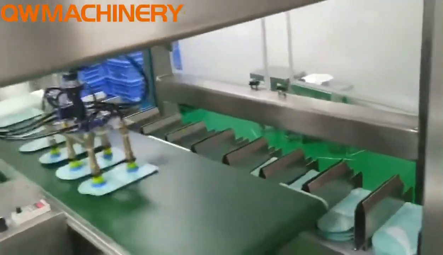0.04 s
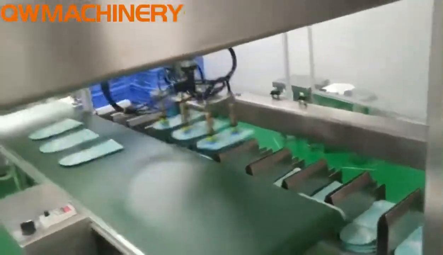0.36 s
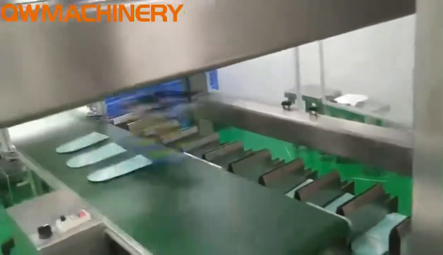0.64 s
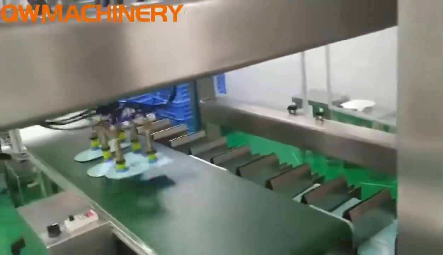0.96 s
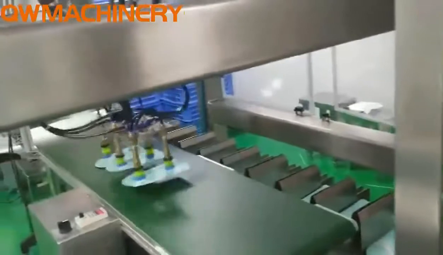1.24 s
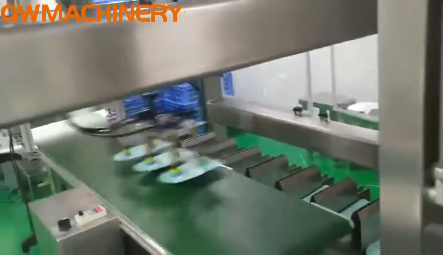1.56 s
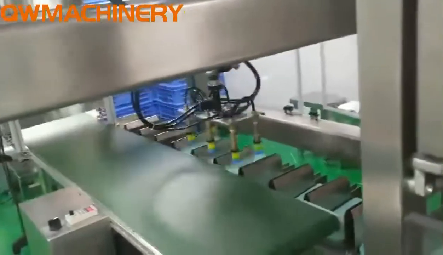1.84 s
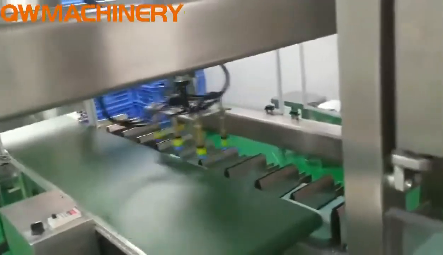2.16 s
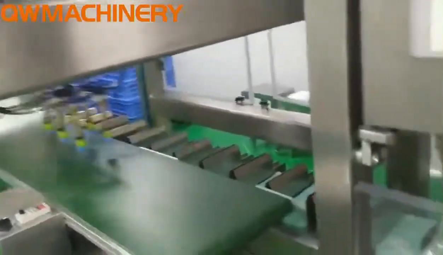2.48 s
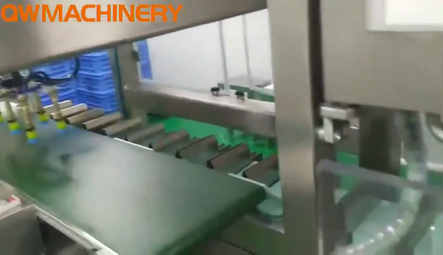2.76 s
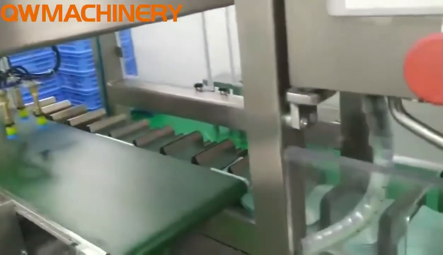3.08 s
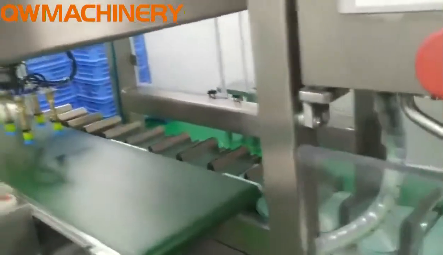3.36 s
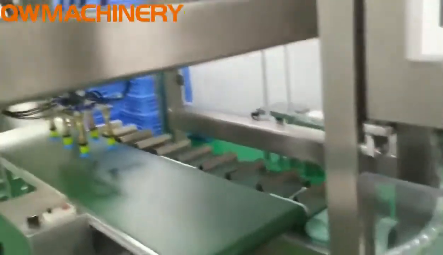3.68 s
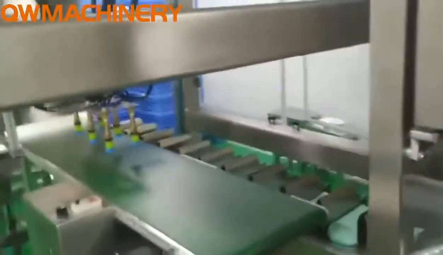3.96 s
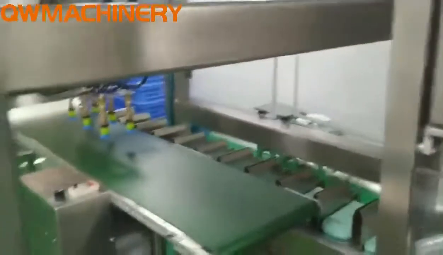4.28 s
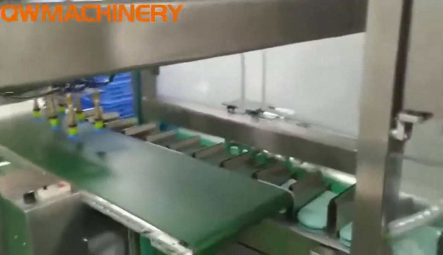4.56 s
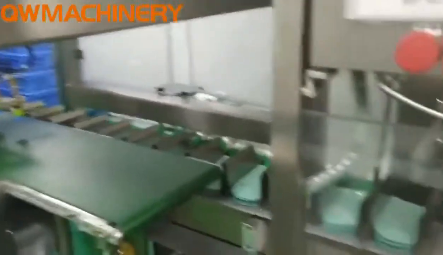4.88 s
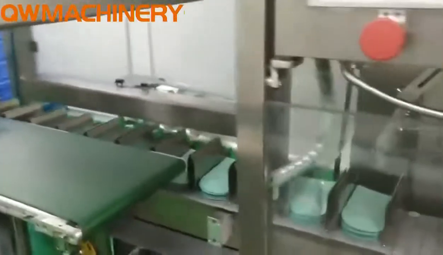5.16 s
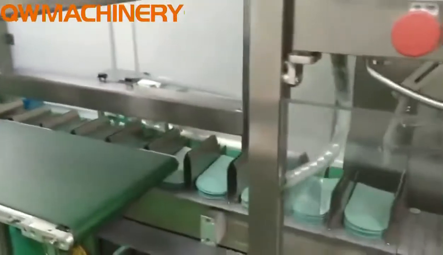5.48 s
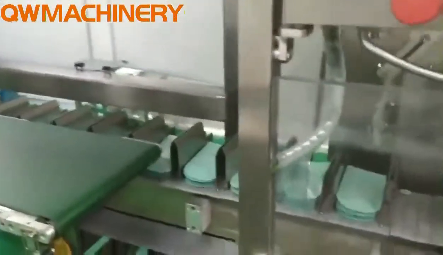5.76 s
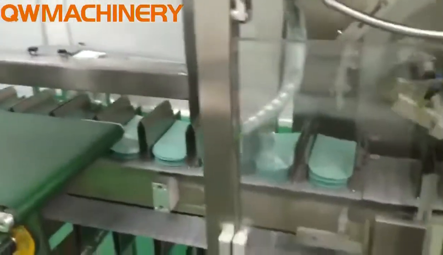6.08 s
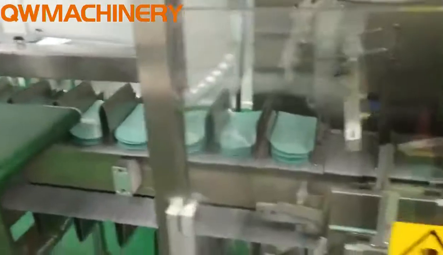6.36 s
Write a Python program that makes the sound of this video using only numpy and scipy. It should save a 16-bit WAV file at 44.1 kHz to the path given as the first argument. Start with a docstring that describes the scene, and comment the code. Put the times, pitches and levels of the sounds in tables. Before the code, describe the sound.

Bursts of hissing air and two brief, raspy cylinder squeals break through the steady hum, whine and conveyor rumble of a packaging line.

```python
"""Pick-and-place packaging line

Heard while walking along it in a hard-walled hall. A vacuum blower hums and a belt motor whines over
rumbling conveyors; the suction head hisses, blows off air and chirps. Twice a pneumatic cylinder's seal
gives a rough, falling squeal amid rushes of spent air. A thin whistle sounds between the strokes."""
import sys
import numpy as np
from scipy import signal
from scipy.fft import rfft, irfft, next_fast_len
from scipy.io import wavfile
from scipy.ndimage import uniform_filter1d, map_coordinates

SR = 44100
rng = np.random.default_rng(int(sys.argv[2]) if len(sys.argv) > 2 else 0)


def unload_wav(signal):
    """Save mono or channel-first audio to the path in sys.argv[1] as 16-bit WAV at rate SR, clipped to [-1, 1]."""
    wavfile.write(
        sys.argv[1],
        SR,
        np.round(np.clip(np.atleast_2d(signal).T, -1, 1) * 32767).astype(np.int16),
    )


N = 287973
TIME = np.arange(N) / SR
TOP_HZ = 7560


def amp(db):
    """Decibels to gain."""
    return 10 ** (np.asarray(db) / 20)


def unit(x):
    """x at rms 1."""
    return x / np.sqrt(np.mean(x ** 2) + 1e-20)


def along(points, hz):
    """Rows of freq_hz, value, read on a log axis."""
    freqs_hz, values = np.transpose(points)
    return np.interp(np.log(hz + 1), np.log(freqs_hz + 1), values)


def curve(points):
    """Rows of time_s, value, read at every sample."""
    return np.interp(TIME, *np.transpose(points))


def wobble(rate_hz):
    """Smooth random curve, rate_hz knots a second."""
    return map_coordinates(rng.standard_normal(int(N * rate_hz / SR) + 4), [TIME * rate_hz])


def gate(start_s, length_s, attack_s, t60_s):
    """Envelope: linear rise, hold until length_s has passed, exponential decay."""
    released_s = np.maximum(TIME - start_s - length_s, 0)
    return np.clip((TIME - start_s) / attack_s, 0, 1) * amp(-60 * released_s / t60_s)


def walk(start_db, end_db):
    """Gain of a source over the walk."""
    return amp(np.linspace(start_db, end_db, N))


def sides(lean_db):
    """Stereo gains; positive leans left."""
    return amp(np.array([[.5], [-.5]]) * lean_db)


def filtered(x, response):
    """x through response(hz)."""
    size = next_fast_len(N + SR // 2)
    return irfft(rfft(x, size) * response(np.fft.rfftfreq(size, 1 / SR)), size)[..., :N]


def rush(spectrum, patchy_db=2.3):
    """Turbulent stereo noise of rms 1, with faint patches of random gain."""
    # freq_hz, left_right_correlation
    likeness = [(60, 1), (170, 1), (350, 0.85), (700, 0.43), (1300, 0), (3000, 0.0056), (7000, 0)]
    bins = signal.stft(rng.standard_normal((2, N)), nperseg=512)[2]
    patches = uniform_filter1d(rng.standard_normal(bins.shape[1:]), size=3, axis=0)
    patches = uniform_filter1d(patches, size=10, axis=1)
    noise = signal.istft(bins * amp(patchy_db * unit(patches)), nperseg=512)[1][:, :N]

    def mid_side(hz):
        width_rad = np.arccos(np.clip(along(likeness, hz), -1, .985)) / 2
        return amp(along(spectrum, hz)) * np.array([np.cos(width_rad), np.sin(width_rad)])

    mid, side = filtered(noise, mid_side)
    return unit(np.array([mid + side, mid - side]))


def tone(hz, apart_rad, drift_hz, waver_db):
    """Stereo machine tone of rms 1; wavers as the listener moves through standing waves."""
    phase = 2 * np.pi * np.cumsum(hz + drift_hz * wobble(9)) / SR
    pair = [amp(waver_db * wobble(3.916)) * np.sin(phase + side * apart_rad / 2) for side in (1, -1)]
    return unit(np.array(pair))


def guards(x):
    """Early echoes off steel guards ripple the hiss; the ripples slide as the listener sways."""
    # delay_s, gain (capped below)
    reflections = [(.0023, 0.21), (.0041, 0.43), (.0068, 0.43)]
    sway_s = 0.00008
    out = x
    for delay_s, gain in reflections:
        earlier_s = TIME - delay_s - sway_s * wobble(2.5)
        out = out + min(gain, .33) * np.array([np.interp(earlier_s, TIME, side) for side in x])
    return out


def hall(x, wet_db):
    """Direct sound plus a diffuse tail that differs left and right."""
    # freq_hz, t60_s
    decay = [(200, 0.54), (1000, 0.56), (4000, 0.19), (8000, 0.13)]
    hz, age_s, bins = signal.stft(rng.standard_normal((2, SR * 3 // 4)), SR, nperseg=256)
    tail = signal.istft(bins * amp(-60 * age_s / along(decay, hz)[:, None]), SR, nperseg=256)[1]
    tail /= np.sqrt(np.mean(np.abs(rfft(tail, SR)[:, :TOP_HZ]) ** 2))
    echo = signal.fftconvolve(np.atleast_2d(x), tail, axes=1)[:, :N]
    return (x + amp(wet_db) * echo) / np.hypot(1, amp(wet_db))


def conveyors():
    """Drives rumble; the shuttling carriage shakes the gantry and thumps at its stops."""
    # freq_hz, density_db
    drive_spectrum = [(20, -35), (45, -24), (62, -16.5), (82, -9.5), (115, -7.5), (160, -0.5), (200, -3),
                      (280, -3), (450, -3), (900, -16.5), (2000, -46)]
    gantry_spectrum = [(60, -31.5), (105, -5.5), (160, -8.5), (182, -12.5), (197, 0.5), (220, -2),
                       (255, -4), (300, -15), (600, -26)]
    # start_s, length_s, level_db
    carriage_runs = [(-.05, .78, -33.5), (0.967, 0.66, -34.5), (1.8, .43, -33)]
    # peak_s, level_db
    carriage_stops = [(0.419, -24.5), (.68, -23.5), (1.03, -26.5), (1.385, -21), (4.947, -27)]
    rise_s = 0.014
    rumble = walk(-32, -35.5) * amp(0.35 * wobble(10)) * rush(drive_spectrum, patchy_db=1.2)
    runs = sum(amp(db) * gate(start_s, length_s, attack_s=0.08, t60_s=0.75)
               for start_s, length_s, db in carriage_runs)
    shake = runs * rush(gantry_spectrum)
    stops = sum(amp(db) * gate(peak_s - rise_s, rise_s, rise_s, t60_s=0.17)
                for peak_s, db in carriage_stops)
    thumps = stops * unit(rush(drive_spectrum) + amp(4) * rush(gantry_spectrum))
    return rumble + shake + thumps


def blower():
    """Shaft harmonics over the vacuum blower's air noise."""
    # freq_hz, density_db
    air_spectrum = [(60, -31), (250, -7), (500, -4), (750, 0.5), (950, -5), (1120, -2.5), (1300, -5.5),
                    (2000, -8.5), (3000, -11), (3550, -20), (4400, -9), (5600, -8.5), (6200, -13.5),
                    (7500, -13)]
    # shaft_multiple, start_db, end_db, apart_rad
    harmonics = [(2, -40, -54.5, 0), (3, -53.5, -57, 0.15), (5, -48.5, -57.5, 0.13), (6, -45, -38.5, 0.64),
                 (7, -45, -53.5, 0.06), (8, -38.5, -35.5, 0.82), (9, -38, -54, 0.8)]
    # time_s, offset_db
    hum_swell = [(0, -1), (1.2, 2.5), (2.5, -2.5), (3.8, 3.5), (5.1, 1.1), (5.7, -1), (6.53, 1)]
    shaft_hz = 97.18
    air = walk(-25.5, -26.83) * amp(0.75 * wobble(12)) * rush(air_spectrum)
    hum = sum(walk(start_db, end_db) * tone(multiple * shaft_hz, apart_rad, drift_hz=1.38, waver_db=1.5)
              for multiple, start_db, end_db, apart_rad in harmonics)
    return air + amp(curve(hum_swell)) * hum


def motor():
    """The belt motor, passed on the way, whines with a faint octave; its inverter sings thinly."""
    # time_s, level_db
    whine_level = [(0, -39), (3.5, -34), (5.6, -36), (6.1, -45.5), (6.53, -40)]
    # pitch_hz, start_db, end_db, apart_rad
    inverter_lines = [(1666, -51, -55, 1), (4935, -47, -54, 2.3), (5000, -43.5, -50.5, 1.6)]
    whine_hz = 1092
    whine = sides(-3) * tone(whine_hz, apart_rad=1.32, drift_hz=2.2, waver_db=2.5)
    octave = amp(-17) * tone(2 * whine_hz, apart_rad=1.0, drift_hz=2.7, waver_db=0)
    inverter = sum(walk(start_db, end_db) * tone(hz, apart_rad, drift_hz=4, waver_db=2.5)
                   for hz, start_db, end_db, apart_rad in inverter_lines)
    return amp(curve(whine_level)) * (whine + octave) + inverter


def suction_head():
    """A leak, left behind on the walk; jets of air open fast and die away as their valve shuts. The early jets
    are the head blowing off; those from 1.4 s on are spent air from the cylinder's strokes."""
    # time_s, level_db
    leak_level = [(0, -23), (2.05, -24), (2.3, -29), (3.2, -27.5), (4.4, -40), (6.53, -48)]
    # freq_hz, density_db
    leak_spectrum = [(500, -26.5), (1500, 0), (2800, 1.5), (3600, -4), (4400, -5.5), (5300, 2.5), (6200, 2),
                     (6800, 5), (7500, 0.5)]
    jet_spectrum = [(150, -25), (500, -5.5), (1100, -4), (1700, 0), (2300, -0.5), (2850, 0), (3400, -11),
                    (3900, -4.5), (4700, -3), (5400, -4.5), (6600, 3), (7500, -4.5)]
    # start_s, length_s, level_db, tilt_db_per_octave, lean_db
    air_bursts = [(0.415, 0.044, -26.5, -4.5, 3), (0.482, 0.16, -22.5, -2.5, 0.5),
                  (1.007, 0.028, -24, -3, 5), (1.396, 0.086, -20, 4, 5.5), (1.757, 0.13, -22, -2.5, 1),
                  (1.918, 0.11, -19, 1.5, 0), (2.048, 0.1, -22.5, -0.5, 4), (5.078, 0.059, -22.5, -2, 1)]
    leak = amp(curve(leak_level) + 0.6 * wobble(17)) * sides(6.4) * rush(leak_spectrum)
    air = rush(jet_spectrum)
    jets = 0
    for start_s, length_s, db, tilt, lean_db in air_bursts:
        hiss = unit(filtered(air, lambda hz: amp(tilt * np.log2(np.maximum(hz, 400) / 3000))))
        jets += amp(db) * gate(start_s, length_s, attack_s=0.018, t60_s=0.35) * sides(lean_db) * hiss
    return leak + jets


def valve_chirp():
    """A short, rough, rising note: a valve seats as the cups take hold."""
    start_s, centre_hz = 1.005, 2495
    rise = np.clip((TIME - start_s) / .04, 0, 1) - .5
    hz = centre_hz * (1 + .1 * rise + .06 * wobble(700))
    note = np.sqrt(2) * np.sin(2 * np.pi * np.cumsum(hz) / SR)
    envelope = amp(-24) * gate(start_s, length_s=0.027, attack_s=0.023, t60_s=0.048)
    return hall(envelope * note, wet_db=12)


def cylinder_exhaust():
    """Spent air puffs from the cylinder's silencer; its valves spit brightly."""
    # start_s, length_s, level_db, t60_s
    silencer_puffs = [(1.458, 0.13, -24, 0.24), (1.778, 0.33, -24, 0.27), (4.746, 0.1, -22, 0.63),
                      (5.07, 0.27, -20.5, 0.22)]
    # start_s, level_db
    valve_spits = [(4.687, -27), (4.76, -26.5), (5.1, -29)]
    # freq_hz, density_db
    puff_spectrum = [(500, -26), (1500, -3), (2400, -2.5), (3050, 0), (3500, -5), (4000, 2), (4500, 4.5),
                     (5200, 1.5), (5900, -4.5), (6800, -4.5), (7500, -3)]
    spit_spectrum = [(2000, -28), (4500, -5), (6500, 5.5), (7500, -2.5)]
    puffs = sum(amp(db) * gate(start_s, length_s, attack_s=0.055, t60_s=t60_s)
                for start_s, length_s, db, t60_s in silencer_puffs)
    spits = sum(amp(db) * gate(start_s, length_s=0.02, attack_s=0.01, t60_s=0.35)
                for start_s, db in valve_spits)
    flutter = amp(0.79 * wobble(30))
    air = puffs * rush(puff_spectrum) + spits * rush(spit_spectrum)
    return hall(guards(flutter * sides(-.97) * air), wet_db=-5.5)


def squeal(start_s, length_s, fundamental_db, overtones_db, slide_hz, fall_hz_per_s, judder_hz):
    """The seal creeps, breaks free, judders and sinks in pitch; uneven stick-slip adds a rasp."""
    # multiple, relative_db
    partials = [(2, 2), (3, -3.5), (4, -8), (5, -6), (6, -4), (7, -7)]
    stick_hz, judder_depth, scatter_rad = 1350, 0.38, 1.0
    creep_s, break_s, grip_t60_s = 0.016, 0.024, 0.23
    age_s = TIME - start_s
    glide = np.clip((age_s + creep_s) / (creep_s + break_s), 0, 1)
    hz = stick_hz + glide * (slide_hz - stick_hz) - fall_hz_per_s * np.clip(age_s, 0, 2 * length_s)
    jitter = .035 * wobble(900) + .02 * wobble(200)
    phase = 2 * np.pi * np.cumsum(hz * (1 + jitter)) / SR

    free = np.clip(age_s / break_s, 0, 1)
    judder_phase = 2 * np.pi * judder_hz * (age_s - break_s) + .5 * wobble(25)
    judder = 1 + judder_depth * free * np.cos(judder_phase)
    creep = amp(-7) * gate(start_s - creep_s, creep_s, creep_s, grip_t60_s)
    grip = gate(start_s, 0.043, break_s, grip_t60_s)  # loud first part of the slide
    slide = gate(start_s, length_s, break_s, t60_s=0.1)
    envelope = np.maximum.reduce([creep, grip, amp(-9.5) * slide])
    rasp = slide * gate(start_s + break_s / 2, 0.045, break_s / 2, t60_s=0.5)

    def flutter(depth):
        return (1 + depth * wobble(400)) / np.hypot(1, depth)

    overtones = sum(amp(db) * flutter(.5) * np.sin(multiple * phase + scatter_rad * wobble(350))
                    for multiple, db in partials)
    fundamental = envelope * judder * flutter(.2) * np.sin(phase)
    return np.sqrt(2) * (amp(fundamental_db) * fundamental + amp(overtones_db) * rasp * overtones)


def cylinder_strokes():
    """Each stroke's squeal arrives from the left and rings through the hall."""
    # start_s, length_s, fundamental_db, overtones_db, slide_hz, fall_hz_per_s, judder_hz
    strokes = [(1.659, 0.17, -15.6, -23, 1080, 800, 54), (4.946, 0.18, -13.5, -22.3, 1050, 480, 42)]
    left_lead_s = 0.00023
    from_left = lambda hz: np.exp(1j * np.pi * hz * left_lead_s * np.array([[1], [-1]]))
    return sum(hall(filtered(squeal(*stroke), from_left), wet_db=-3) for stroke in strokes)


def whistle():
    """A brief, thin, high note."""
    envelope = amp(-40) * gate(start_s=4.02, length_s=0.19, attack_s=0.025, t60_s=0.137)
    return envelope * tone(hz=5060, apart_rad=0.74, drift_hz=12, waver_db=3.5)


def scene():
    """The whole line at work."""
    machines = conveyors() + blower() + motor()
    pneumatics = guards(suction_head()) + valve_chirp() + cylinder_exhaust() + cylinder_strokes()
    return machines + pneumatics + whistle()


def record(dry):
    """Steep low-pass at TOP_HZ."""
    return filtered(dry, lambda hz: np.clip((TOP_HZ - hz) / 100 + .5, 0, 1))


dry = scene()
out = record(dry)
unload_wav(out)
```